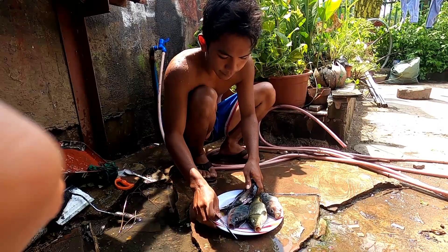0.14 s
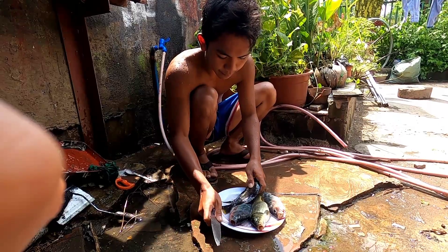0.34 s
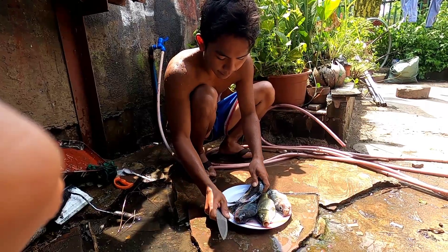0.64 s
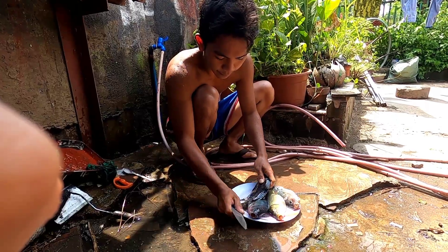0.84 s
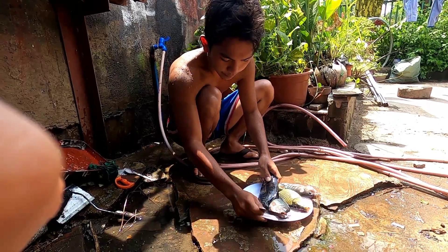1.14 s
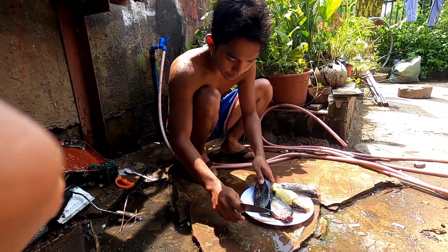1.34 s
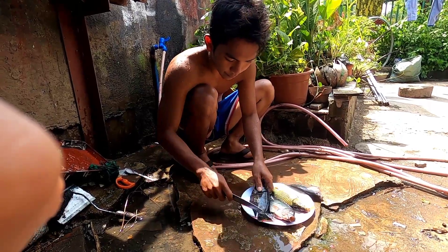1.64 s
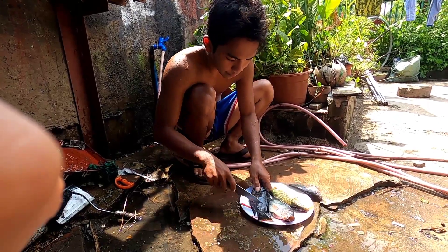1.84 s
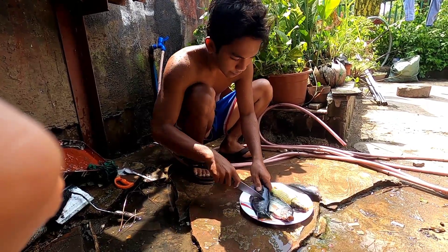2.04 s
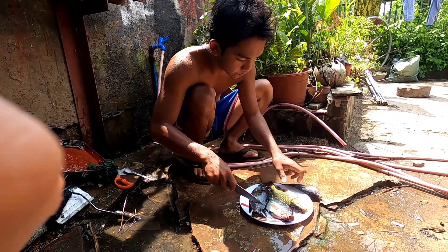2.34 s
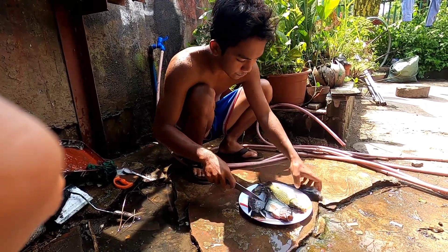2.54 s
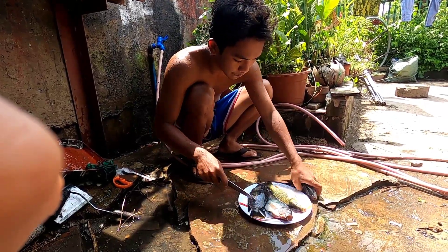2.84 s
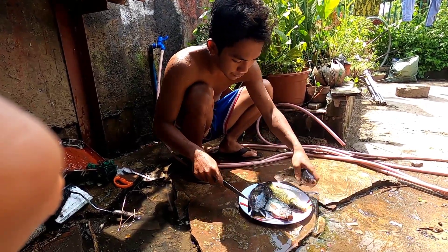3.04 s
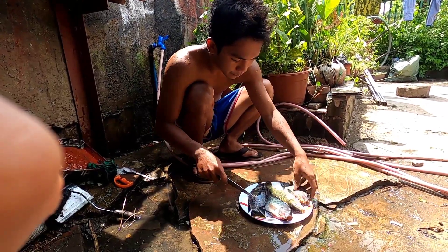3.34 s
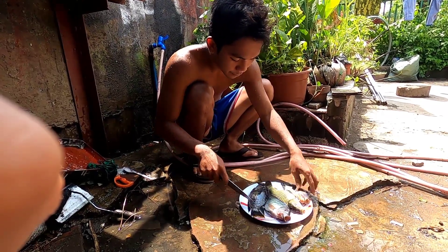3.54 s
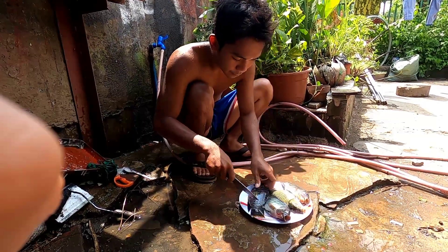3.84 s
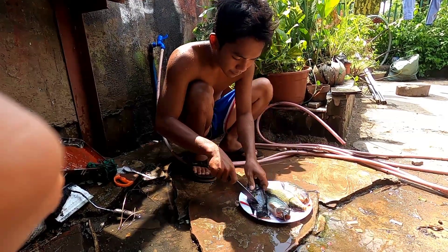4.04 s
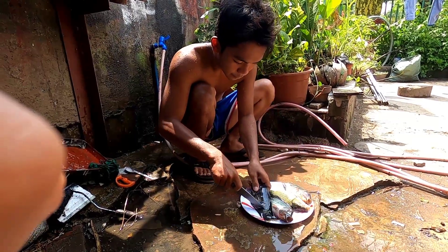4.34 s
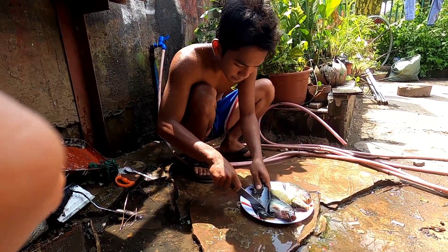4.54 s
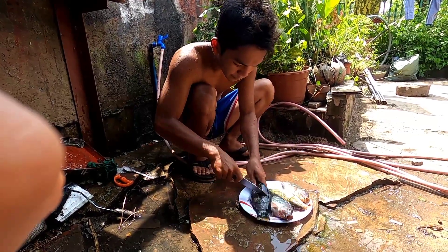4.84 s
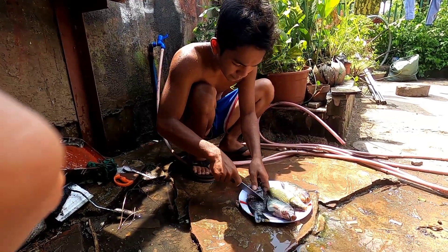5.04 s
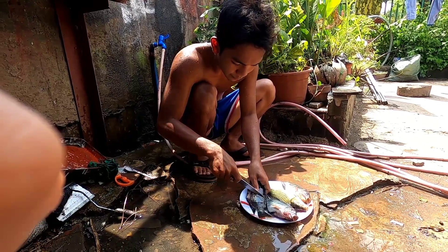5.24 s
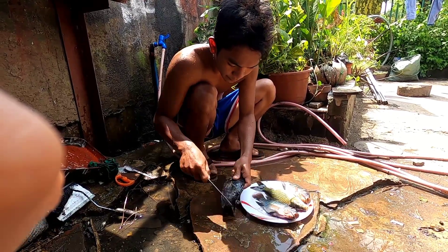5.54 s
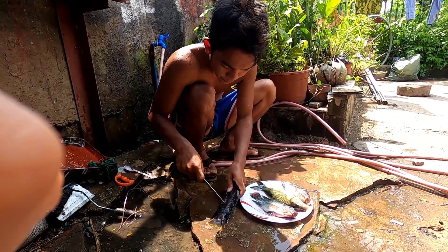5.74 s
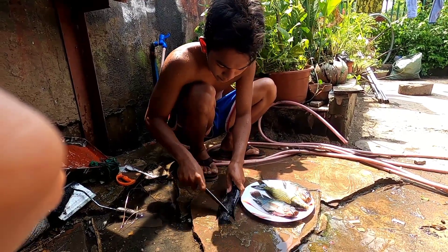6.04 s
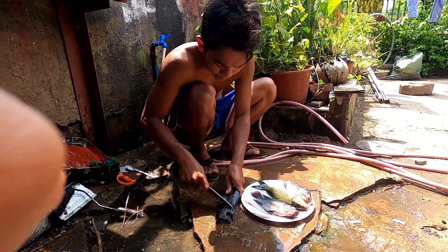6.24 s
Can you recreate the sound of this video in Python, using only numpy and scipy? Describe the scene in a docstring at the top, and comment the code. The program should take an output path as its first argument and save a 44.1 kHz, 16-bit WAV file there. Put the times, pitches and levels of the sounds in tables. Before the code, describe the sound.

Engine roar fades from a walled stone yard as a knife scrapes fish scales on a plate in short scratches, birds whistling late.

```python
"""Two engines sound first in a walled stone yard: sines at firing orders and a low tone near 60 Hz, over noise.
Their roar fades as one pulls away; scales snap as filtered spikes, knocks ring a plate's modes and a panel clunks.
From 1.6 s a knife scrapes a fish on the plate, as gated noise and damped rings, densest after 4.4 s.
From 4.6 s a far bird, and from 5.6 s a nearer one, whistle gliding sines from the left.
The walls answer the knife work and the birds with decaying noise."""
import sys
import numpy as np
from scipy import signal
from scipy.fft import rfft, irfft, next_fast_len
from scipy.io import wavfile
from scipy.ndimage import uniform_filter1d, map_coordinates

SR = 44100
rng = np.random.default_rng(int(sys.argv[2]) if len(sys.argv) > 2 else 0)


def wav_out(sig):
    """Save sig, one row per channel (or a flat mono array), as 16-bit PCM at SR to the path in sys.argv[1]."""
    wavfile.write(sys.argv[1], SR, np.round(np.clip(np.atleast_2d(sig).T, -1, 1) * 32767).astype(np.int16))


N = 282240
TIME = np.arange(N) / SR


def amp(db):
    """Decibel law: twenty dB is a factor of ten in amplitude."""
    return 10 ** (np.asarray(db) / 20)


def unit(x):
    """Power normalisation: x at rms 1."""
    return x / np.sqrt(np.mean(x ** 2) + 1e-20)


def peak(x):
    """Peak normalisation: the largest excursion of x at 1."""
    return x / np.abs(x).max()


def along(points, hz):
    """Logarithmic frequency scale: interpolate (Hz, value) points on it."""
    f, v = np.transpose(points)
    return np.interp(np.log(hz + 1), np.log(f + 1), v)


def curves(rows, t=TIME):
    """Linear interpolation in time: one curve for each column after the seconds."""
    s, *cols = np.transpose(rows)
    return [np.interp(t, s, c) for c in cols]


def wobble(rate):
    """Band-limited fluctuation: a smooth random curve with rate knots a second."""
    knots = rng.standard_normal(int(N * rate / SR) + 4)
    return map_coordinates(knots, [TIME * rate])


def filtered(x, response):
    """Linear filtering: the spectrum of x times a complex response of frequency."""
    m = next_fast_len(x.shape[-1] + 8192)
    spectrum = rfft(x, m) * response(np.fft.rfftfreq(m, 1 / SR))
    return irfft(spectrum, m)[..., :x.shape[-1]]


def resonances(modes):
    """Modal superposition: causal second-order peaks of (Hz, width Hz, dB), alternating in sign."""
    def response(f):
        total = 0
        for k, (centre, width, db) in enumerate(modes):
            damping = 1j * f * width
            total = total + (-1) ** k * amp(db) * damping / (centre * centre - f * f + damping)
        return total
    return response


def panned(x, db):
    """Interaural level difference: mono to two channels, db louder on the left."""
    return x * amp(np.array([db / 2, -db / 2]).reshape(2, -1))


def tone(hz, db):
    """Phase integration: a sine of changing frequency at rms level db."""
    phase = np.cumsum(hz) / SR + rng.random()
    return np.sqrt(2) * amp(db) * np.sin(2 * np.pi * phase)


def patchy(x, depth_db):
    """Spectral modulation: bright and dull patches, some 500 Hz by 12 ms, as scales of other sizes pass."""
    z = signal.stft(x, nperseg=256)[2]
    field = uniform_filter1d(rng.standard_normal(z.shape), 3, 0)
    field = uniform_filter1d(field, 4, 1)
    return signal.istft(z * amp(depth_db * unit(field)), nperseg=256)[1][:N]


def flicks(hz, count=2200):
    """Impulsive excitation: scales flicked by the edge ring briefly, scattered round the pitch hz."""
    draw = rng.random((count, 3))
    start = (draw[:, 0] * (N - 400)).astype(int)
    pitch = hz[start] * np.exp(0.13 * rng.standard_normal(count))
    turns = pitch[:, None] * TIME[:400]
    strength = amp(-5 * np.log(draw[:, 1:2] + 0.03))
    envelope = np.exp(-turns / 12) * (1 - np.exp(-turns / 1.0))
    rings = strength * envelope * np.sin(2 * np.pi * turns)
    places = start[:, None] + np.arange(400)
    return unit(np.bincount(places.ravel(), rings.ravel(), N))


# Knife strokes. Each row: start of the hold in seconds, hold in seconds, treble level in dB,
# body level above the treble in dB, pitch of the scales in Hz.
KNIFE_STROKES = [(1.62, 0.058, -75.5, 21.5, 3770), (2.1, 0.0064, -53.5, 6, 4305),
                 (2.15, 0.016, -48, 3.5, 4540), (2.19, 0.058, -67.5, 3, 4430), (2.32, 0.017, -85, 28, 4200),
                 (2.41, 0.017, -83, 29, 4180), (2.595, 0.041, -78.5, 23, 4250),
                 (2.866, 0.059, -78.5, 21, 4200), (3.39, 0.015, -76, 24, 4350),
                 (3.5, 0.0055, -82.5, 30, 4900), (3.59, 0.043, -91.5, 30.5, 4730),
                 (4.125, 0.054, -71, 13.5, 4460), (4.455, 0.039, -59.5, 6.5, 4280),
                 (4.53, .012, -61, 7, 4240), (4.67, 0.027, -59.5, 13, 4400), (4.722, 0.0031, -48, 5, 4460),
                 (4.74, 0.054, -72, -4, 4330), (4.815, 0.013, -60.5, 7, 4480), (4.84, .03, -74, 4, 4560),
                 (4.878, .012, -56.5, 11, 4900), (4.899, 0.005, -55, 11, 4900),
                 (4.922, 0.022, -48, 0, 4670), (4.955, 0.011, -46.5, 9, 4360), (4.98, 0.044, -72, 10, 4504),
                 (5.042, 0.0091, -52.5, 15.5, 5050), (5.06, 0.016, -55.5, 13, 4650),
                 (5.085, .015, -64.5, 10, 4560), (5.256, 0.049, -72.5, 12, 4200),
                 (5.66, 0.0042, -68, 8, 4900), (5.768, 0.017, -58, 7, 4750), (5.97, 0.0086, -62, 7, 4800),
                 (6.0, 0.006, -44.5, -1, 5230), (6.012, 0.027, -44.5, 4.5, 4900),
                 (6.098, .006, -53, 4, 4450), (6.11, .008, -45.5, -9, 4330), (6.185, 0.022, -47, 6, 4480),
                 (6.216, 0.0097, -42, 0, 4970), (6.24, 0.01, -66.5, 15, 4600),
                 (6.262, 0.0027, -45.5, 9, 5160), (6.272, 0.002, -34, -9, 4420),
                 (6.298, 0.032, -52, 13.5, 4400), (6.33, 0.027, -44, -6, 4560),
                 (6.392, .01, -49.5, 8, 4630)]
# Spectrum of the rubbing body. Each row: frequency in Hz, relative density in dB per Hz.
SCRAPE_BODY_SPECTRUM = [(710, -43), (1200, -10), (1950, -12), (2150, -5.5), (2680, 2.5), (3300, -1.5),
                        (3900, -5), (4460, -10.5), (5020, 3.5), (6170, -10.5), (7000, -21), (9100, -52),
                        (15400, -120)]
# Filter of the scraping treble. Each row: frequency in Hz, relative gain in dB.
SCRAPE_TREBLE_GAIN = [(3410, -33), (5800, 0), (6260, -2.5), (8100, 0.5), (10100, -5.5), (11000, -1),
                      (12000, -17), (13200, -7), (15200, -27)]
# Modes of the blade. Each row: centre in Hz, width in Hz, gain in dB.
BLADE_MODES = [(2450, 74, -10), (4210, 43, -0.5), (4460, 120, 2.5), (4970, 49, -2), (5030, 210, -6)]
BITE_DB_PER_S, LIFT_DB_PER_S = 1602, 801  # rise before and fall after each hold


def strokes():
    """Stick-slip friction: the edge skips over scales with flicks, ticks and rubbing; the blade sings along."""
    ticks = (rng.random(N) < 1100 / SR) * rng.standard_normal(N)  # some 1100 a second
    ticks = ticks * amp(5 * rng.random(N))
    rough = unit(ticks) * 0.55 + rng.standard_normal(N)
    grit = patchy(rough * amp(3.8 * wobble(220)), depth_db=4.0)
    rub = unit(filtered(grit, lambda hz: amp(along(SCRAPE_BODY_SPECTRUM, hz))))
    sing = unit(filtered(grit, lambda hz: resonances(BLADE_MODES)(hz) / (1 + 1j * hz / 6000) ** 3))
    pitch_hz = curves(KNIFE_STROKES)[-1]
    body = at_ports(unit(0.74 * rub + 0.49 * sing + 1.04 * flicks(pitch_hz)))
    # the treble comes from all along the blade, so each port hears partly its own
    spread = at_ports(grit) + 1.0 * grit * np.sign(rng.standard_normal((2, N)))
    treble = unit(filtered(spread, lambda hz: amp(along(SCRAPE_TREBLE_GAIN, hz))))
    treble_gain, body_gain = np.zeros((2, N))
    for s, hold, db, body_db, _ in KNIFE_STROKES:
        before = np.maximum(s - TIME, 0)
        after = np.maximum(TIME - s - hold, 0)
        press = amp(db - BITE_DB_PER_S * before - LIFT_DB_PER_S * after)
        treble_gain = treble_gain + press
        body_gain = body_gain + amp(body_db) * press
    return treble_gain * treble + body_gain * body


# Scales snapping. Each row: start in seconds, peak level in dB, centre in Hz,
# treble above that peak in dB, rustle above that peak in dB.
SCALE_SNAPS = [(0.051, -28.5, 2170, -38, -3), (0.089, -26, 1740, -45, -7.5),
               (0.3908, -17, 2620, -11, -12.5), (0.392, -12, 4350, -32, -12.5),
               (0.3924, -19, 2300, -26, -12), (1.3374, -23, 4550, -31, -2.5), (2.097, -39, 4084, -25.5, -9),
               (2.1475, -21, 4330, 1, -9), (2.321, -48, 4186, -38, -4), (2.379, -40.5, 3967, -44, -5),
               (2.412, -46, 4055, -38, -8), (2.59, -44, 4210, -33, 1), (2.871, -38, 4470, -26, -5),
               (2.879, -37, 3493, -34, -2), (2.9006, -30.5, 3800, -23, -4.5), (2.904, -29, 2280, -26, -2.5),
               (3.387, -33.5, 2260, -25, -6.5), (3.423, -36, 2365, -39, -5), (3.4517, -32.5, 2310, -35, -6),
               (3.4955, -30, 4770, -14, -7.5), (4.136, -43, 3220, -24, -1), (4.5298, -36.5, 4290, -25, -5),
               (4.686, -36, 4100, -13, -5), (4.7171, -22.5, 4900, -2.5, -6), (4.7567, -43, 3590, -26, -25),
               (4.898, -22.5, 5040, -7, -6), (4.922, -28.5, 4900, -0.5, -6), (4.934, -23.5, 4940, -0.5, -6),
               (4.9407, -22.5, 5000, -12, -12), (4.9645, -24, 3736, -30, -2), (5.037, -34, 4660, -27, -6),
               (5.326, -48, 5280, -25, -10), (5.4484, -42, 2320, -23, -9), (5.532, -42.5, 4600, -18, -6.5),
               (5.617, -44, 5200, -29, -10), (5.664, -45, 5600, -23, -10.5),
               (5.7528, -11, 5400, -27.5, -10), (5.97, -41, 3420, 0, -2), (6.0038, -36.5, 5207, -11, -7),
               (6.0987, -37, 5000, -0.5, -12), (6.184, -34, 5000, -2, -10), (6.204, -27, 3077, -14, -5),
               (6.2178, -22.5, 5420, -16, -8), (6.226, -25, 5130, -18, -4.5),
               (6.2629, -22, 5160, -17, -5.5), (6.2674, -15, 4080, -19.5, -9.5),
               (6.2687, -20, 5530, -11, -5), (6.2975, -25.5, 4200, -24, -13)]
RUSTLE_T60 = 0.038  # s


def snaps():
    """Impulse response: each scale cracks as one full spike and a short thin rustle, round its pitch plus treble."""
    out, t = np.zeros(N + SR), TIME[:SR // 8]
    steel = [(c, w, level - 10.0) for c, w, level in BLADE_MODES]
    flesh = resonances([(1540, 3200, -26.5)])
    for s, db, hz, treble_db, rustle_db in SCALE_SNAPS:
        scale = resonances([(hz, .5 * hz, 0), (4800, 1800, -8)] + steel)

        def low_response(f):
            spike_part = scale(f) - flesh(f)
            rustle_part = scale(f) * 1j * f / (2500 + 1j * f)  # thinned below 2500 Hz
            return np.array([spike_part, rustle_part]) / (1 + 1j * f / 6000) ** 3

        hiss = amp(-60 * t / RUSTLE_T60) * rng.standard_normal(len(t))
        burst = np.array([t == 0, hiss])
        low = filtered(burst, low_response)
        high = filtered(burst, resonances([(8700, 2900, 0)]))
        spike, rustle = [peak(a) + amp(treble_db) * peak(b) for a, b in zip(low, high)]
        out[round(s * SR):][:len(t)] += amp(db) * (spike + amp(rustle_db) * rustle)
    return out[:N]


# Thumps of the knocks, blade squeaks and small narrow snaps. Each row: start in seconds, start pitch in Hz,
# resting pitch in Hz, glide time constant in seconds, starting peak level in dB, T60 in seconds.
GLIDING_TONES = [(4.94, 450, 600, .005, -40, .06), (5.036, 330, 620, .004, -36, .09),
                 (5.533, 4800, 4550, .004, -42, .035), (5.563, 5100, 4900, .004, -45, .04),
                 (5.662, 5500, 5700, .004, -48, .035), (5.448, 2400, 2300, .003, -43, .02),
                 (5.045, 4700, 4350, .02, -38, .12), (4.9645, 2800, 4300, .003, -29, .03),
                 (5.037, 130, 85, .01, -31, .06), (5.036, 1350, 1300, .003, -34, .025),
                 (4.8, 2400, 1850, .002, -28, .025), (5.061, 2700, 2850, .003, -37, .03),
                 (3.497, 5150, 5050, .003, -55, .2), (3.6, 5050, 4950, .003, -59, .25),
                 (5.781, 2000, 5600, .008, -37, .04)]


def gliding_tones():
    """Exponential relaxation: thumps, squeaks and narrow snaps glide to a resting pitch and die."""
    out, t = np.zeros(N + SR), TIME[:SR // 10]
    for s, start_hz, end_hz, glide, db, t60 in GLIDING_TONES:
        hz = end_hz + (start_hz - end_hz) * np.exp(-t / glide)
        phase = np.cumsum(hz) / SR
        out[round(s * SR):][:len(t)] += amp(db - 60 * t / t60) * np.sin(2 * np.pi * phase)
    return out[:N]


# Knocks on the plate. Each row: start in seconds, peak level in dB, gain of the low part in dB,
# chatter in seconds, T60 of the blow after the chatter in seconds.
PLATE_KNOCKS = [(0.3918, -23.5, -9, 0.0034, 0.034), (1.336, -10, -9, 0.0085, 0.036),
                (1.357, -25.5, 3, 0.01, 0.08), (4.9395, -40, -3, 0.0055, 0.056),
                (5.036, -29, -3, 0.004, 0.036), (5.901, -45, -15, 0.024, 0.055),
                (6.021, -42, 0, 0.0098, 0.034), (6.222, -40, 4, 0.017, 0.055),
                (6.2669, -32, -5, 0.0048, 0.044)]
# Modes of the loaded plate. Each row: centre in Hz, width in Hz, gain in dB.
PLATE_MODES = [(332, 65, 1), (469, 66, 9), (620, 100, 1.5), (885, 56, 3), (1027, 75, 4.5), (1210, 86, 2),
               (1580, 130, 1.5), (1994, 210, 3.5), (2320, 205, 1.5), (2650, 140, -1.5), (3240, 380, -3),
               (4330, 570, -3.5), (4900, 300, -2)]


def knocks():
    """Forced modal vibration: a chattering blow thuds into the loaded plate."""
    out, t = np.zeros(N + SR), TIME[:SR // 5]
    for s, db, low_db, chatter, t60 in PLATE_KNOCKS:
        unevenness = 0.75 + (rng.random(len(t)) < 1200 / SR) * 1.5
        taps = (t == 0) * 7 + rng.standard_normal(len(t)) * unevenness
        blow = taps * amp(-60 * np.maximum(t - chatter, 0) / max(t60, .01))

        def response(f):
            low_shelf = (amp(low_db) + 1j * f / 1400) / (1 + 1j * f / 1400)
            return resonances(PLATE_MODES)(f) * low_shelf / (1 + 1j * f / 5500) ** 4

        out[round(s * SR):][:len(t)] += amp(db) * peak(filtered(blow, response))
    return out[:N]


# Notes of a near bird, one list of rows a note. Each row: time in seconds, pitch in Hz, rms level in dB.
NEAR_BIRD_NOTES = [
    [(5.608, 3400, -52), (5.617, 3494, -36.5), (5.627, 3477, -31.5), (5.638, 3500, -30.5),
     (5.644, 3550, -35), (5.65, 3780, -53)],
    [(5.813, 3460, -68), (5.821, 3426, -39), (5.83, 3440, -39), (5.848, 3412, -38), (5.864, 3465, -35.5),
     (5.868, 3560, -35), (5.874, 3620, -56)],
    [(6.054, 3310, -56), (6.066, 3300, -45), (6.074, 3364, -44), (6.086, 3380, -44), (6.1, 3360, -42),
     (6.112, 3326, -37), (6.124, 3352, -35), (6.135, 3303, -40), (6.143, 3330, -34), (6.152, 3460, -45),
     (6.165, 3480, -58)],
    [(6.286, 3420, -53), (6.3, 3430, -44), (6.318, 3395, -35), (6.338, 3360, -30), (6.365, 3320, -28.5),
     (6.376, 3360, -27.5), (6.384, 3290, -31), (6.393, 3330, -30), (6.41, 3500, -36)],
]
# Notes of a higher bird farther off. Each row: time in seconds, pitch in Hz, rms level in dB.
FAR_BIRD_NOTES = [
    [(4.556, 3800, -62), (4.566, 3824, -45), (4.58, 3720, -54), (4.6, 3730, -53), (4.62, 3704, -52),
     (4.65, 3780, -64), (4.672, 3750, -69)],
    [(4.748, 3540, -64), (4.767, 3570, -49), (4.782, 3746, -44), (4.797, 3683, -46), (4.81, 3670, -46),
     (4.822, 3685, -39.5), (4.838, 3710, -53), (4.855, 3720, -56), (4.875, 3690, -65)],
    [(5.19, 3530, -62), (5.202, 3600, -47), (5.212, 3703, -44), (5.222, 3630, -50), (5.228, 3680, -63),
     (5.24, 3740, -51), (5.27, 3740, -60.5), (5.32, 3720, -66), (5.345, 3700, -67)],
    [(5.404, 3735, -65), (5.412, 3740, -63), (5.427, 3672, -53), (5.434, 3640, -65)],
]


def bird(notes, waver_hz, flutter_db, pan_db):
    """Frequency and amplitude modulation: whistles swell and glide, wavering in pitch and strength."""
    out, waver, flutter = np.zeros(N), wobble(150), wobble(120)
    for note in notes:
        start, end = note[0][0], note[-1][0]
        part = slice(round(start * SR), min(N, round(end * SR)))
        t = TIME[part]
        hz, db = curves(note, t)
        ends = np.clip(np.minimum(t - start, end - t) / .0015, 0, 1)  # 1.5 ms ramps
        out[part] = ends * tone(hz + waver_hz * waver[part], db + flutter_db * flutter[part])
    return panned(out, pan_db)


# Speed of the steady engine. Each row: time in seconds, firing rate in Hz.
FIRING_RATE = [(0.2, 40.18), (0.47, 39.97), (1.42, 40.18), (1.75, 39.9), (2.07, 40.07), (6.2, 39.11)]
# Its strong orders. Each row: time in seconds, rms levels of orders 2, 3, 4 and 5 in dB.
STRONG_ORDERS = [(0.05, -33, -42.5, -37.5, -39), (0.35, -34, -40.5, -37.5, -38.5),
                 (0.54, -35, -57, -45.5, -44.5), (0.73, -34, -41.5, -42.5, -46),
                 (0.96, -30, -38.5, -46, -39), (1.03, -29, -62, -51, -40.5), (1.5, -34, -54, -51, -48),
                 (2.05, -36, -42.5, -43, -44.5), (2.15, -38, -46.5, -55, -44), (2.31, -42, -56, -49, -62),
                 (2.66, -42, -48, -46.5, -52.5), (2.87, -46, -53, -44.5, -53.5),
                 (3.1, -48, -56.5, -50, -50), (3.37, -39, -43.5, -49, -52.5), (3.45, -45, -56, -47, -63),
                 (3.96, -42, -48, -48, -52), (4.17, -44, -57, -53.5, -63), (4.38, -50, -50, -47, -50.5),
                 (5.72, -54, -58, -65.5, -65), (6.35, -64, -72, -60, -58)]
# Its other orders. Each row: multiple of the firing rate, rms level at the start in dB, fade in dB per second.
WEAK_ORDERS = [(1, -37.5, 5), (6, -49, 2.5), (7, -50, 1.5), (8, -50.5, 4), (9, -50, 4), (10, -44.5, 9),
               (11, -51, 4.5)]
# Low tone near 60 Hz, sinking while strong, then a faint unsteady hum in the noise.
# Each row: time in seconds, pitch in Hz, rms level in dB.
LOW_TONE = [(0.0, 58.2, -18), (0.43, 61.94, -29), (0.78, 61.05, -44), (0.96, 60.3, -33.5),
            (1.48, 59.1, -47), (1.66, 57.8, -36.5), (2.14, 56.56, -43), (2.53, 55.85, -34),
            (2.85, 57.3, -47), (2.99, 62.8, -50.5), (4.35, 60.2, -51.5), (4.51, 65.5, -45.5),
            (4.76, 62, -51), (4.92, 57.6, -46), (5.92, 53.2, -57.5), (6.1, 63.3, -53.5), (6.31, 50.2, -44),
            (6.4, 58, -58)]
WANDER_DB = 3.5  # each weaker order swells and sinks on its own
WAVER_DB, DRIFT_HZ = 2.4, .8  # strong tones waver; the orders slide against each other off the walls


def engines():
    """Harmonic series: four strong firing orders, seven that fade and wander, and a low tone near 60 Hz."""
    rate, = curves(FIRING_RATE)
    low_hz, low_db = curves(LOW_TONE)
    sound = tone(low_hz, low_db + WAVER_DB * wobble(6))
    for order, db in enumerate(curves(STRONG_ORDERS), start=2):
        sound += tone(order * rate + DRIFT_HZ * wobble(5), db + WAVER_DB * wobble(7))
    for order, db, fade in WEAK_ORDERS:
        level_db = db - fade * TIME + WANDER_DB * wobble(4)
        sound += tone(round(order) * rate + DRIFT_HZ * wobble(5), level_db)
    return panned(sound, 0.73)


# Clunks of a loose panel. Each row: start in seconds, peak level in dB.
PANEL_CLUNKS = [(0.854, -36), (0.875, -32), (0.9114, -23), (0.948, -35), (0.99, -37.5), (1.016, -27),
                (1.029, -33), (1.055, -27.5), (1.083, -31.5), (1.102, -30), (1.1545, -36)]
# Modes of the panel. Each row: centre in Hz, width in Hz, mean gain in dB.
PANEL_MODES = [(494, 53, 1), (1031, 25, 9), (1930, 41, -1), (2540, 130, -7), (3000, 150, -15),
               (3560, 180, -9.5), (4250, 210, -10)]


def rattle():
    """Modal excitation: a loose panel clunks softly a few times, far off, its mode gains varying."""
    out, t = np.zeros(N + SR), TIME[:SR // 8]
    for s, db in PANEL_CLUNKS:
        panel = resonances([(c, w, level + rng.normal(0, 2)) for c, w, level in PANEL_MODES])
        push = (t == 0) + 0.33 * rng.standard_normal(len(t)) * np.exp(-t / 0.003)
        clunk = filtered(push, lambda f: panel(f) / (1 + 1j * f / 3500) ** 2)
        out[round(s * SR):][:len(t)] += amp(db) * peak(clunk)
    return panned(out[:N], 0.77)


# Likeness of the two channels. Each row: frequency in Hz, left-right correlation from -1 to 1.
CHANNEL_LIKENESS = [(60, 0.95), (150, 0.97), (380, 0.82), (940, 0.73), (2350, 0.47), (5880, 0.9),
                    (14700, -0.23)]


def rush(spectrum):
    """Partial coherence: stereo noise of rms 1 whose likeness between channels depends on frequency."""
    def mid_side(hz):
        turn = np.arccos(np.clip(along(CHANNEL_LIKENESS, hz), -1, 1)) / 2
        return amp(along(spectrum, hz)) * np.array([np.cos(turn), np.sin(turn)])

    mid, side = filtered(rng.standard_normal((2, N)), mid_side)
    return unit(np.array([mid + side, mid - side]))


# Engine and street noise. Each row: time in seconds, rms levels of rumble, roar and hiss in dB.
STREET_LEVELS = [(0.0, -39, -41, -44), (0.21, -43, -42, -46.5), (0.53, -39.5, -39.5, -45.5),
                 (0.75, -43.5, -42, -48), (0.95, -43.5, -41, -46), (1.41, -41.5, -45, -51),
                 (1.94, -47.5, -48, -54.5), (2.3, -47, -50, -54.5), (3.0, -51, -52.5, -56.5),
                 (3.67, -47.5, -55.5, -58), (4.21, -49, -55.5, -57), (4.87, -47.5, -57.5, -52.5),
                 (5.28, -49.5, -56, -58.5), (5.54, -50, -55.5, -58), (5.88, -50.5, -58, -56),
                 (6.4, -47.5, -57, -56)]
# Spectra of the three layers. Each row: frequency in Hz, relative density in dB per Hz.
RUMBLE_SPECTRUM = [(12, -36), (24, -7.5), (40, -4.5), (55, -7.5), (82, -2.5), (118, -6), (167, -4),
                   (270, -16), (600, -45.5), (780, -61), (1320, -120)]
ROAR_SPECTRUM = [(150, -34), (250, 0.5), (403, -3.5), (745, -9), (936, -8.5), (1030, -4.5), (1130, -4.5),
                 (1510, -9), (1960, -12.5), (2150, -36.5), (3000, -37), (3900, -37.5), (6600, -120)]
HISS_SPECTRUM = [(1290, -8.5), (2200, -2), (2330, 1.5), (2520, -5.5), (3450, -4.5), (4280, -8.5),
                 (5030, -9.5), (6350, -20), (6990, -19.5), (9800, -31.5), (15000, -54)]


def street():
    """Shaped broadband noise: rumble, roar and hiss swell a little, the upper two partly together."""
    rumble_db, roar_db, hiss_db = curves(STREET_LEVELS)
    swell = wobble(14)
    noise = amp(rumble_db + 1.1 * wobble(4.4)) * rush(RUMBLE_SPECTRUM)
    noise += amp(roar_db + .7 * swell + .6 * wobble(5)) * rush(ROAR_SPECTRUM)
    noise += amp(hiss_db + .9 * swell + 1.3 * wobble(25)) * rush(HISS_SPECTRUM)
    return noise


# Decay of the walled yard. Each row: frequency in Hz, T60 in seconds.
YARD_DECAY = [(300, 0.23), (2000, 0.35), (3200, 0.33), (3900, 0.39), (5500, 0.21), (10000, 0.24)]


def yard(x):
    """Reverberant decay: each frequency of the walls' answer dies at its own speed."""
    hz, t, z = signal.stft(rng.standard_normal((2, SR // 2)), SR, nperseg=256)
    decay = amp(-60 * t / along(YARD_DECAY, hz)[:, None])
    tail = signal.istft(z * decay, SR, nperseg=256)[1]
    delayed = np.pad(x, ((0, 0), (250, 0)))  # 250 samples
    return signal.fftconvolve(delayed, tail / np.linalg.norm(tail[0]), axes=1)[:, :N]


# Phase between the two microphone ports. Each row: frequency in Hz, left lead in radians.
PORT_PHASE_LEAD = [(0, -0.5), (1380, 0.64), (1720, 0.5), (2580, 0.97), (2840, 1.07), (5250, 0.5),
                   (6200, -3), (8350, -1.5), (8870, -1.5), (10900, -3), (12700, -1.5), (14900, -2.5)]
# Level between the ports. Each row: frequency in Hz, left minus right in dB.
PORT_LEVEL_BALANCE = [(60, -2.5), (110, 0.5), (200, 3), (380, 2), (690, -7.5), (1280, 2.5), (2350, 2),
                      (4330, 5), (7990, 1.5), (14700, 1)]


def at_ports(x):
    """Near-field difference: a near source reaches two ports with its own phase and level per frequency."""
    def response(hz):
        half = amp(along(PORT_LEVEL_BALANCE, hz) / 2) * np.exp(.5j * along(PORT_PHASE_LEAD, hz))
        return np.array([half, 1 / half])
    return filtered(x, response)


def left_late(x):
    """Time difference of arrival: far sound reaches the left port two samples later."""
    return np.array([np.pad(x[0], (2, 0), "edge")[:N], x[1]])


def scene():
    """Direct-to-reverberant ratio: the near work is fairly dry, the birds wet."""
    work = strokes() + at_ports(snaps() + gliding_tones() + knocks())
    near = bird(NEAR_BIRD_NOTES, waver_hz=6.5, flutter_db=-2.5, pan_db=3.0)
    distant = bird(FAR_BIRD_NOTES, waver_hz=25, flutter_db=0.5, pan_db=6.5)
    far = left_late(engines() + street() + rattle())
    echo = yard(amp(-14.0) * work + amp(-4.0) * near + amp(-5.5) * distant)
    return far + work + near + distant + echo


TOP_HZ = 15326  # band limit


def record(dry):
    """Band limitation: the camera keeps nothing above its limit."""
    return filtered(dry, lambda hz: hz < TOP_HZ)


dry = scene()
out = record(dry)
wav_out(out)
```